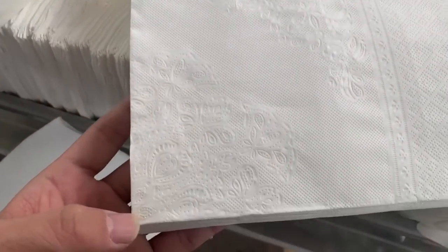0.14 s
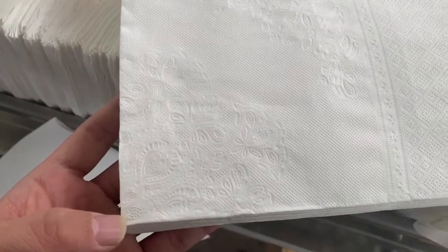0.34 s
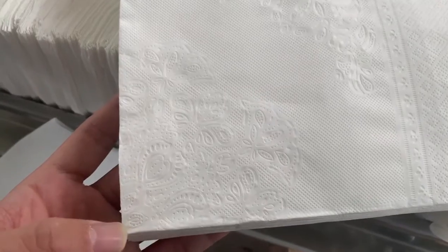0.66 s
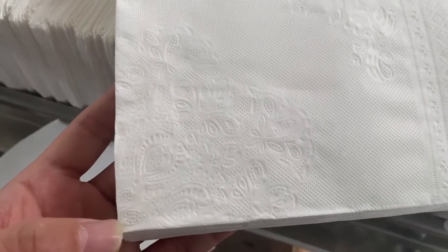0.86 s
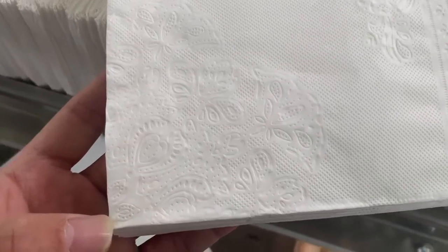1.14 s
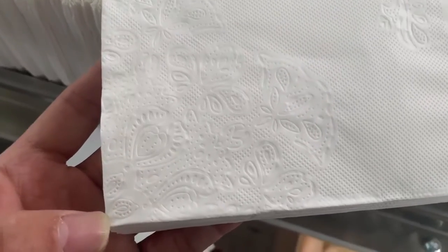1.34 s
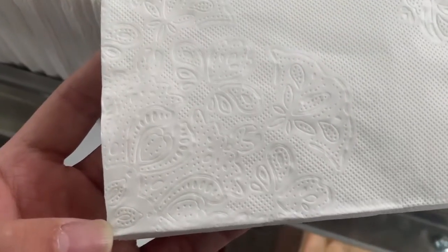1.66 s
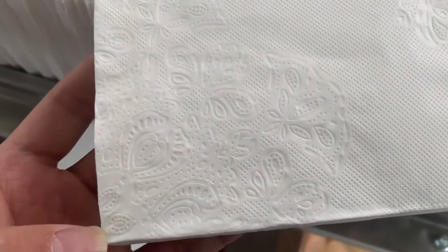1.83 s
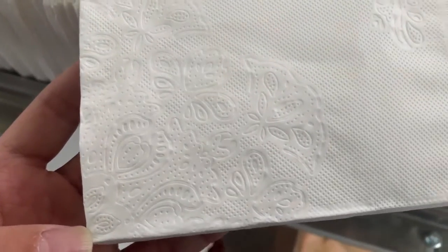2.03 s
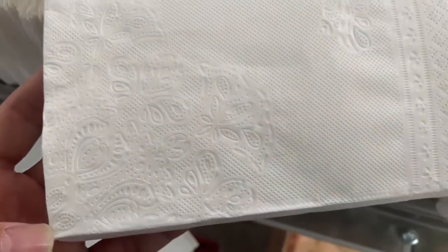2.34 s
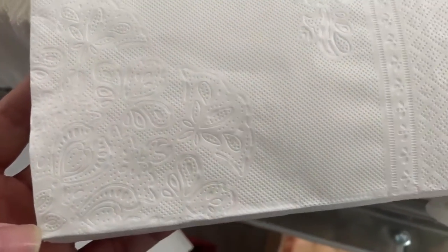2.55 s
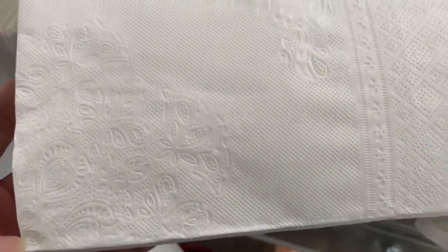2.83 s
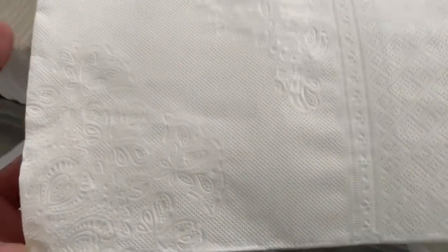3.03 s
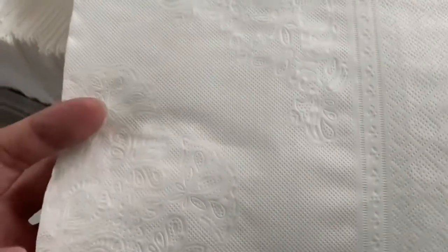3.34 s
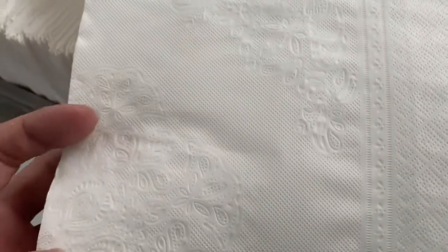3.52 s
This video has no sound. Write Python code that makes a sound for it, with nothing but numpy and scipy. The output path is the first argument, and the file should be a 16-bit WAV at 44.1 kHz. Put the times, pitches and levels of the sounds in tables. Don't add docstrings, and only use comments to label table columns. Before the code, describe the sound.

Close factory machinery rumbles and knocks rapidly, slows to a stop, leaving motor drone and hiss.

```python
import sys
import numpy as np
from scipy import signal
from scipy.fft import rfft, irfft
from scipy.io import wavfile
from scipy.ndimage import uniform_filter1d

SR = 44100
rng = np.random.default_rng(int(sys.argv[2]) if len(sys.argv) > 2 else 0)


def generate_wav(sig):
    pcm = np.round(np.clip(np.atleast_2d(sig).T, -1, 1) * 32767).astype(np.int16)
    wavfile.write(sys.argv[1], SR, pcm)


def volts(x):
    e = np.asarray(x, float) / 20
    return 10 ** e


N = 162288


def rms_one(x):
    return x / np.sqrt(np.mean(x ** 2) + 1e-20)


def at_hz(points, hz):
    p = np.array(points, float)
    return np.interp(np.log(hz + 1), np.log(p[:, 0] + 1), p[:, 1])


def drift(rate_hz):
    r = np.exp(-80 * np.pi * rate_hz / SR)
    noise = rng.standard_normal(N // 40 + 2002)
    slow = rms_one(signal.lfilter([1], [1, -2 * r, r * r], noise)[2000:])
    return np.interp(np.arange(N) / 40, np.arange(len(slow)), slow)


def peak(x, hz, width_hz):
    r = np.exp(-np.pi * width_hz / SR)
    feedback = [1, -2 * r * np.cos(2 * np.pi * hz / SR), r * r]
    return signal.lfilter(np.array([1, 0, -1]) * (1 - r * r) / 2, feedback, x)


def resonate(grit, modes):
    return rms_one(sum(volts(db) * rms_one(peak(grit, hz, width_hz)) for hz, width_hz, db in modes))


def ports(direct, diffuse):
    # (frequency [Hz], phase [rad])
    lead_points = [(0, 0), (1500, 3.1), (3100, 9.42), (4800, 15.7), (6900, 22.0), (7600, 22.0),
                   (8700, 25.13), (10100, 25.13), (11000, 22.0)]
    # (frequency [Hz], share [0-1])
    common = [(40, .995), (130, .95), (280, .8), (700, .45), (2500, .45), (3100, .7), (3700, .45),
              (4800, .65), (6300, .3), (7000, .75), (7550, .9), (8100, .4), (8600, .9), (8800, .99),
              (9800, .99), (10500, .4), (11000, 1.0)]
    # (frequency [Hz], level [dB])
    lean = [(60, 0.5), (250, -3.5), (800, 3), (1500, -1.5), (3700, 2), (5600, -2), (7000, 0.5), (11000, -1)]
    hz = np.arange(N // 2 + 1) * SR / N
    lead = np.interp(hz, *np.transpose(lead_points))
    share = at_hz(common, hz)
    side = np.array([[0.5], [-0.5]])
    delayed = rfft(direct) * np.exp(1j * side * lead)
    mixed = np.sqrt(share) * delayed + np.sqrt(1 - share) * rfft(diffuse)
    return irfft(mixed * volts(side * at_hz(lean, hz)), N)


def hall(x, t60_s):
    t = np.arange(SR // 2) / SR
    tail = rng.standard_normal((2, len(t))) * volts(-60 * t / t60_s)
    tail = tail / np.sqrt(np.sum(tail ** 2, axis=1, keepdims=True))
    return signal.fftconvolve(x[None], tail, axes=1)[:, :N]


def air(spectrum, patchy_db):
    hz = np.arange(N // 2 + 1) * SR / N
    bottom_hz, top_hz = spectrum[0][0], spectrum[-1][0]
    white = rfft(ports(rng.standard_normal(N), rng.standard_normal((2, N))))
    coloured = white * volts(at_hz(spectrum, hz)) * (hz > bottom_hz / 1.2) * (hz < top_hz * 1.05)
    place = 1.5 * np.log2(hz / 20 + 1e-9)
    together = drift(3)
    first, last = int(1.5 * np.log2(bottom_hz / 24)), int(1.5 * np.log2(top_hz / 19)) + 1
    out = 0
    for k in range(first, last + 1):
        band = np.cos(np.pi / 2 * np.clip(place - k, -1, 1)) ** 2
        flicker = volts(patchy_db * (0.25 * together + drift(18)))
        out = out + irfft(coloured * band, N) * flicker
    return rms_one(out)


def hall_drone():
    # (frequency [Hz], density [dB per Hz])
    spectrum = [(15, -27), (36, -39), (55, -11), (138, -4.5), (217, -7.5), (576, -21.5), (900, -22),
                (1500, -25.5)]
    return volts(-34.5) * air(spectrum, patchy_db=2.5)


def air_hiss(swing_db):
    # (frequency [Hz], density [dB per Hz])
    spectrum = [(1200, -3.5), (1600, -1.5), (3000, -6), (3600, -5), (4800, -8), (7000, -9.5), (9600, -9),
                (10950, -11), (11250, -16.5)]
    return volts(-40.5 + 0.042 * swing_db) * air(spectrum, patchy_db=1.23)


def motor_hum():
    # (frequency [Hz], level [dB rms], wobble [dB], share of the load swing [ratio])
    lines = [
        (59.05, -44.5, 1, 0.18),
        (132.7, -44.5, 3, 0.24),
        (218, -42, 2, 1.44),
        (448, -60.5, 2.5, 0.69),
        (529, -59, 2, 0.084),
        (606, -65, 4, 0.088),
        (656.6, -54.5, 1, 0.14),
    ]
    # (time [s], level [dB])
    load = [
        (0, -36),
        (.15, -55.5),
        (.9, -36.5),
        (1.3, -31.5),
        (1.5, -36.5),
        (2.5, -36),
        (2.9, -43.5),
        (3.25, -34.5),
        (3.68, -33.5),
    ]
    t = np.arange(N) / SR
    s, load_db = np.transpose(load)
    swing_db = np.interp(t, s, load_db - load_db.mean())
    out = np.zeros(N)
    for hz, db, wobble_db, share in lines:
        strength = np.sqrt(2) * volts(db + share * swing_db + wobble_db * drift(6.8))
        phase = 0.48 * drift(6.6) + rng.uniform(0, 7)
        out += strength * np.sin(2 * np.pi * hz * t + phase)
    return ports(out, out)


def gear_rumble(start_db, swing_db):
    # (frequency [Hz], density [dB per Hz])
    spectrum = [(24, -48), (40, -13), (264, 0), (346, -4), (453, -5.5), (1470, -19.5), (2380, -24),
                (3300, -33), (4000, -31), (5200, -52.5), (8800, -120)]
    return volts(start_db + 3 + 1.29 * swing_db) * air(spectrum, patchy_db=1.5)


def guard_panel():
    # (time [s], peak [dB], pitch [Hz], t60 [s])
    jolts = [(.002, -18.5, 558, 0.19), (.085, -19.5, 557, 0.46), (.19, -27.5, 658, 0.91),
             (.49, -26, 571, 0.22), (.595, -22.5, 572, 0.13), (.815, -23.5, 565, 0.15),
             (.935, -22, 554, 0.098), (0.949, -21.5, 451.5, 0.2), (1.179, -34, 493, 0.089),
             (1.32, -26, 450, 0.22), (.41, -26.5, 866, 0.51), (2.12, -29.5, 878, 0.2),
             (2.14, -28.5, 598, 0.11)]
    rise_s, right_gain = 0.006, -0.19
    out, t = np.zeros(N + SR), np.arange(SR // 2) / SR
    for s, db, hz, t60_s in jolts:
        shape = (1 - np.exp(-(t / rise_s) ** 2)) * volts(-60 * t / t60_s)
        i = int(s * SR)
        out[i:i + len(t)] += volts(db) * shape / shape.max() * np.sin(2 * np.pi * hz * t)
    return out[:N] * np.array([[1], [right_gain]])


def clacks():
    # (time [s], peak [dB], ring [Hz], length [s], latch share [0-1])
    strikes = [(.102, -31, 3600, 0.018, 0.05), (.1196, -27, 3300, 0.018, 0.1),
               (.1815, -34.5, 4180, 0.01, 1), (.366, -41, 6600, 0.0099, 0.6),
               (.3865, -35, 2610, 0.016, 0.4), (.3995, -36, 2480, 0.029, .2),
               (.4105, -26.5, 3140, 0.028, 0), (.4724, -25, 5460, 0.013, 0.57),
               (.492, -34.5, 3330, 0.016, 0.5), (.7295, -31, 2490, 0.03, 0),
               (.8026, -30.5, 4100, 0.0095, 0.65), (.9394, -37, 1950, 0.0085, 0.4),
               (1.0785, -26, 2250, 0.025, 0), (1.1538, -29, 5740, 0.0041, 0.94),
               (1.163, -33.5, 6000, 0.011, 0.92), (1.4944, -35, 2470, 0.041, 0.23),
               (1.5933, -34, 4170, 0.01, 0.75), (1.8233, -33.5, 2080, 0.0065, 0),
               (2.12, -32.5, 2370, 0.038, 0.03), (2.225, -37.5, 2430, 0.024, 0.11)]
    # (frequency [Hz], width [Hz], level [dB])
    frame_modes = [(866, 5, 7.5), (626, 310, -1), (1103, 700, 5), (2250, 900, 6.5), (3300, 280, -10.5),
                   (4810, 760, -17), (9150, 700, -9)]
    # (frequency [Hz], width [Hz], level [dB])
    dull_modes = [(2420, 81, -2.5), (4180, 100, -3), (5440, 100, -3.5), (9550, 610, -11.5)]
    # (frequency [Hz], width [Hz], level [dB])
    bright_modes = [(3330, 120, 0), (5350, 81, -4), (7640, 600, 1), (9200, 400, -1), (10550, 660, -2),
                    (11550, 300, -5)]
    gain_db, rise_s, tail_db, tail_s = -3, 0.0012, -13.5, 0.041
    ring_db, ring_width_hz, bright_above_hz = -2, 160, 5000
    out, t = np.zeros(N + SR), np.arange(SR // 4) / SR
    grit = rng.standard_normal((len(strikes), len(t)))
    body = resonate(grit, frame_modes)
    dull = resonate(grit, dull_modes)
    bright = resonate(grit, bright_modes)
    for k, (s, db, hz, length_s, share) in enumerate(strikes):
        burst = np.exp(-(t / length_s) ** 2) + volts(tail_db) * np.exp(-t / tail_s)
        shape = (1 - np.exp(-t / rise_s)) * burst
        latch = bright if hz > bright_above_hz else dull
        ring = volts(ring_db) * rms_one(peak(grit[k], hz, ring_width_hz))
        rattle = (1 - share) * body[k] + share * latch[k] + (share + 0.04) * ring
        i = int(s * SR)
        out[i:i + len(t)] += volts(db + gain_db) * shape * rattle
    return out[:N]


def thumps():
    # (time [s], peak [dB], pitch [Hz])
    landings = [(0.002, -15.5, 307.6), (0.01, -18, 233), (0.192, -12.5, 275.6), (0.298, -15.5, 268),
                (0.379, -22, 282.4), (0.411, -20.5, 148), (0.494, -12, 265), (0.604, -15.5, 264),
                (0.66, -17.5, 269), (0.733, -13.5, 132.5), (0.818, -8.5, 265.3), (.875, -21, 139),
                (0.934, -10, 261.5), (1.05, -21.5, 235), (1.06, -19, 141.5), (1.099, -28, 204),
                (1.177, -13.5, 246.6), (1.313, -12.5, 236.3), (1.384, -17.5, 213.8), (1.47, -21.5, 196.4),
                (1.51, -24, 213.4), (1.554, -21, 186), (1.64, -22, 132), (1.796, -18, 147.2),
                (1.999, -20.5, 215.3)]
    # (frequency ratio, level [dB])
    overtones = [
        (1.0, 0),
        (2.1, -19),
        (1.8, -17.5),
    ]
    rise_s, hold_s, t60_s, gain_db = 0.0058, 0.023, 0.077, -5
    out, t = np.zeros(N + SR), np.arange(SR // 2) / SR
    shape = (1 - np.exp(-(t / rise_s) ** 2)) * volts(-60 * np.maximum(t - hold_s, 0) / t60_s)
    shape = shape / shape.max()
    for s, db, hz in landings:
        i = int(s * SR)
        for ratio, part_db in overtones:
            tone = np.sin(2 * np.pi * hz * ratio * t)
            out[i:i + len(t)] += volts(db + part_db + gain_db) * shape * tone
    return out[:N]


def scene():
    # (time [s], level [dB])
    effort = [
        (0.0, -30.5),
        (0.34, -30),
        (0.53, -29),
        (1.729, -35),
        (1.89, -38),
        (2.89, -40),
        (3.15, -37),
        (3.68, -40),
    ]
    s, db = np.transpose(effort)
    swing_db = np.interp(np.arange(N) / SR, s, db) - db[0]
    background = hall_drone() + air_hiss(swing_db) + motor_hum()
    machine = gear_rumble(db[0], swing_db) + guard_panel()
    low, high = thumps(), clacks()
    near = low + high
    knocks = ports(near, hall(near, t60_s=0.028))
    room = volts(-7.5) * hall(low + 0.84 * high, t60_s=0.81)
    return background + machine + knocks + room


def stereo_rounding(x):
    # (frequency [Hz], step [dB])
    step_points = [(100, -18), (2400, -18), (3100, -16.5), (3800, -18.5), (4800, -18.5), (5500, -20),
                   (6300, -18.5), (7300, -17), (8100, -22), (9000, -18.5), (11500, -24)]
    # (tooth width [bins], depth [dB])
    comb = [
        (1, 2.8),
        (5, 1.8),
    ]
    # (patch width [bins], over muting level [dB])
    mute = [
        (16, 0),
        (6, 1.5),
    ]
    comb_frames, comb_above_hz = 10, 1700
    step_wobble_db, round_up, mute_under_db = 1.5, 0.2, -5
    hop, lead_in, bins = 1024, 1416, np.arange(576)
    hz = bins * SR / (2 * hop)
    basis = np.cos(np.pi / hop * np.outer(np.arange(2 * hop) + 0.5 + hop / 2, bins + 0.5))
    basis = basis * signal.windows.kaiser_bessel_derived(2 * hop, 4 * np.pi)[:, None]
    pair = np.pad([x[0] + x[1], x[0] - x[1]], ((0, 0), (lead_in, 2 * hop))) / 2
    starts = np.arange(0, N + lead_in, hop)
    z = pair[:, starts[:, None] + np.arange(2 * hop)] @ basis

    for size, depth_db in comb:
        chance = rng.standard_normal((2, len(starts), len(bins)))
        teeth = uniform_filter1d(chance, comb_frames, axis=1)[..., bins // size]
        teeth = volts(depth_db * rms_one(teeth))
        z = z * np.where(hz > comb_above_hz, rms_one(teeth), 1)

    wobble = rng.standard_normal((2, len(starts), 36)).repeat(16, axis=2)
    step = volts(at_hz(step_points, hz) + step_wobble_db * wobble)
    step[0] *= volts(7 * (hz > 10950))
    for size, over_db in mute:
        power = (z / step).reshape(2, len(starts), -1, size) ** 2
        patch = np.mean(power, axis=3).repeat(size, axis=2)
        z = z * (patch > volts(2 * (mute_under_db + over_db)))

    levels = np.floor(abs(z / step) ** 0.75 + round_up)
    frames = (np.sign(z) * levels ** (4 / 3) * step) @ basis.T * 2 / hop
    out = np.zeros((2, len(starts) + 1, hop))
    out[:, :-1] += frames[..., :hop]
    out[:, 1:] += frames[..., hop:]
    mid, side = out.reshape(2, -1)[:, lead_in:lead_in + N]
    return np.array([mid + side, mid - side])


def low_pass(x):
    return signal.sosfilt(signal.butter(12, 12100, fs=SR, output="sos"), x)


def record(dry):
    mix = stereo_rounding(dry)
    return low_pass(mix)


dry = scene()
out = record(dry)
generate_wav(out)
```